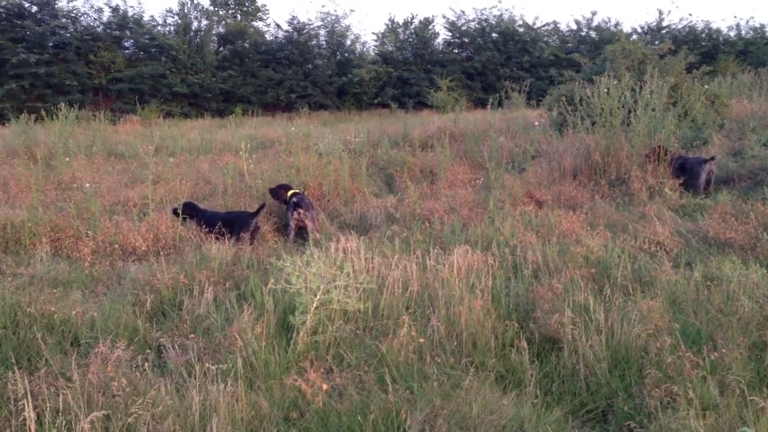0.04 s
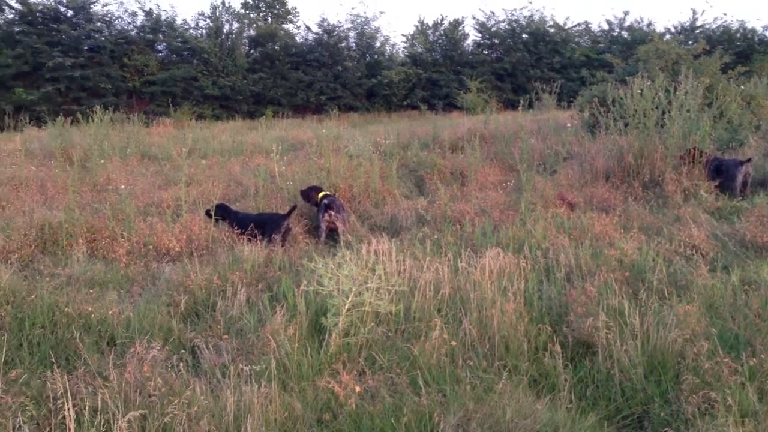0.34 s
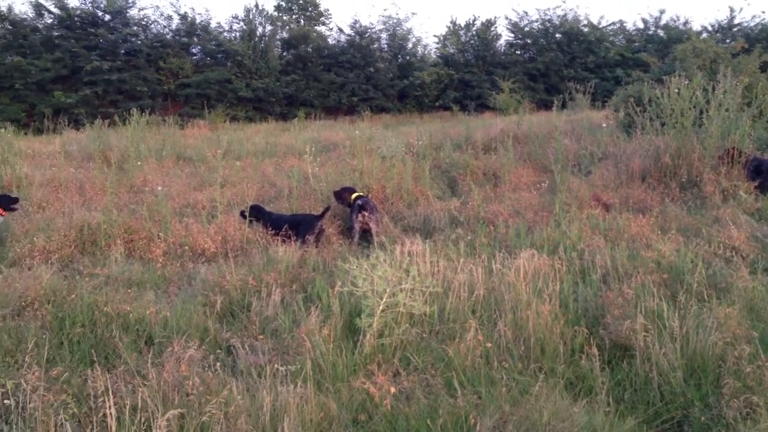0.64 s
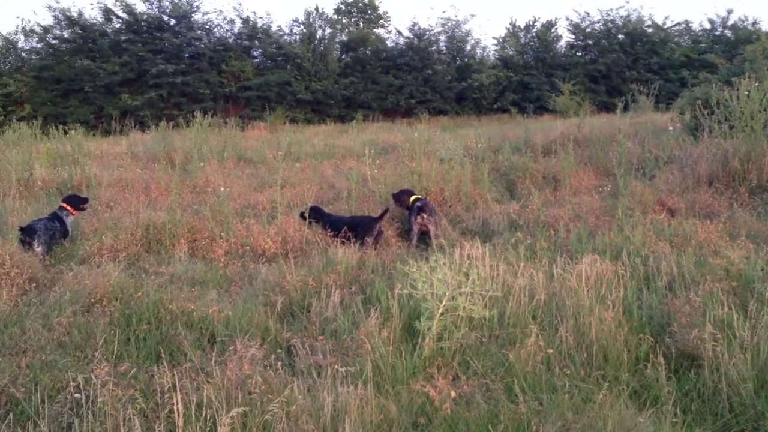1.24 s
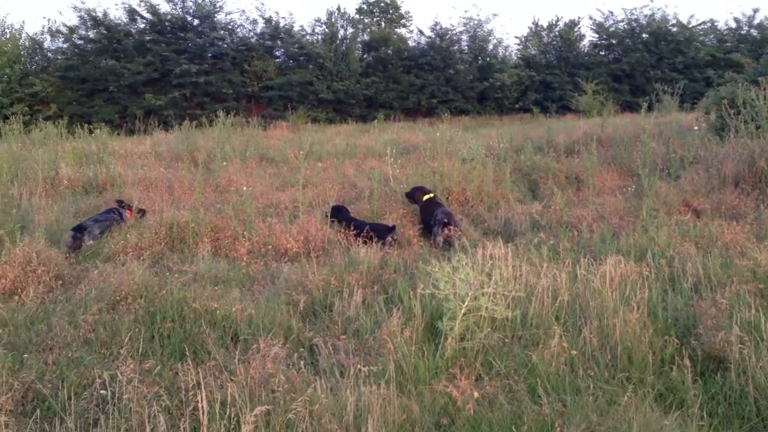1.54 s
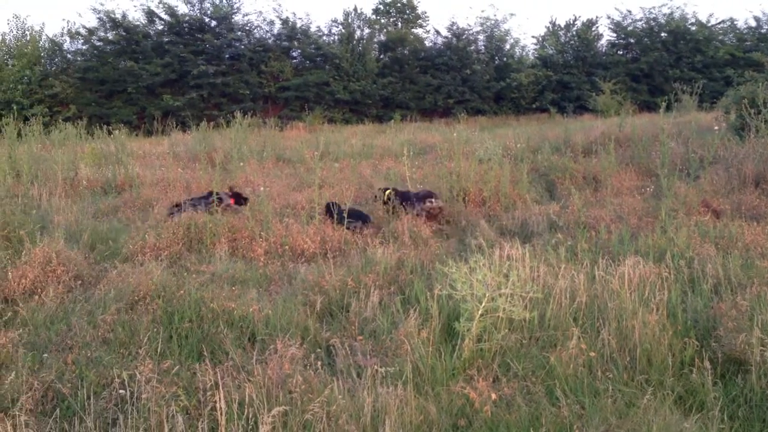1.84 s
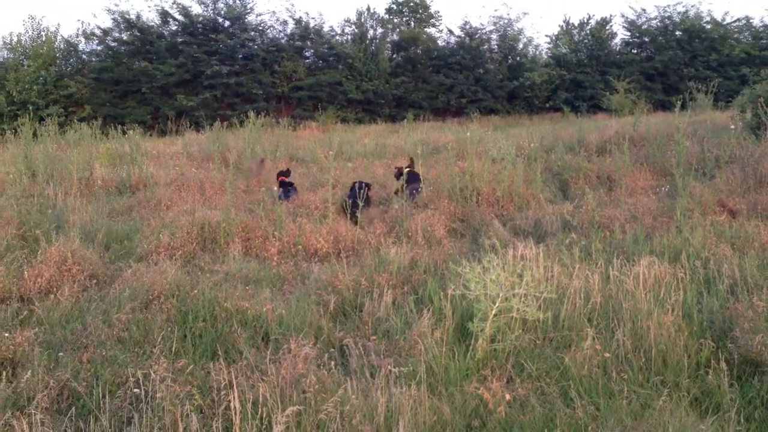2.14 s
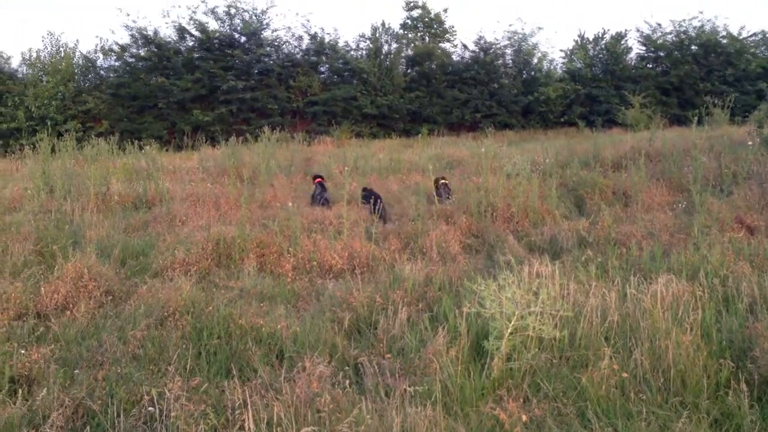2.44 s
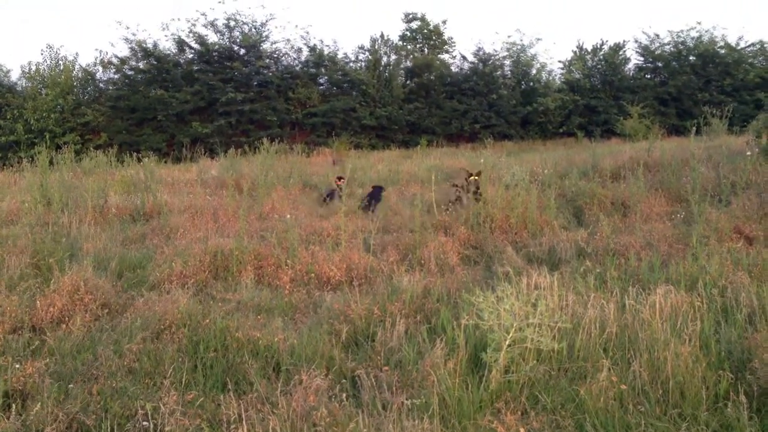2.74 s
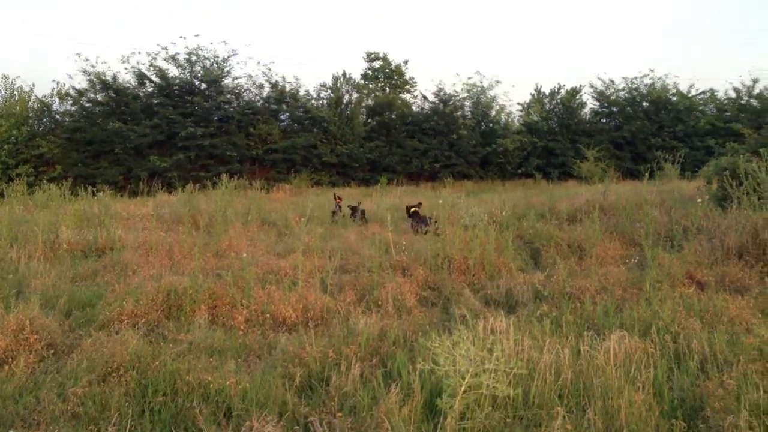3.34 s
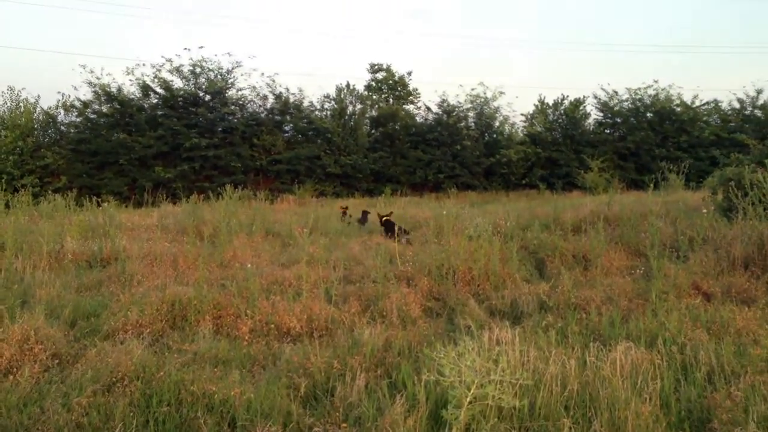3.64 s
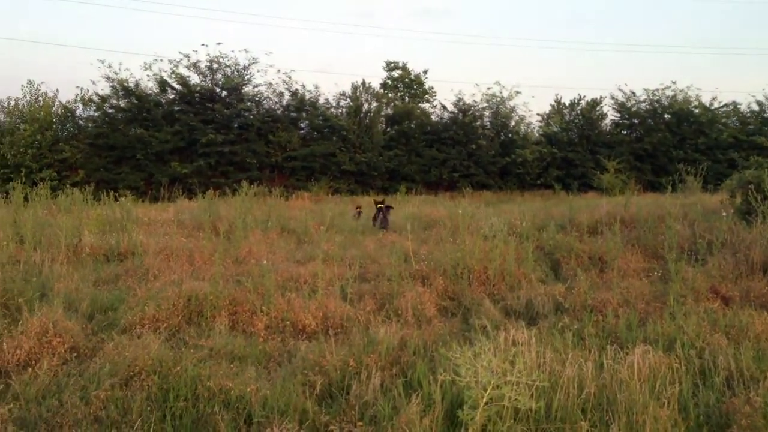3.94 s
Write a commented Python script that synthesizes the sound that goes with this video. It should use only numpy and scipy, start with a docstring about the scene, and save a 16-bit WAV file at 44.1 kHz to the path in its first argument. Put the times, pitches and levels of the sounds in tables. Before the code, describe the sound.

Dogs run through tall dry grass in an open field. After a quiet start with a faint hiss of air, stems swish and crack and paws drum on dry ground ahead of the microphone, thinning as the dogs move away.

```python
"""A quiet field of tall dry grass, in mono, with three dogs standing ahead of the microphone.
Open air murmurs and hisses; two stalks crack faintly, with a brief far-off tone between them.
At 1.4 s the dogs bolt: stems swish and crackle along their bodies and more stalks crack.
From about 1.9 s their paws drum on the dry ground and crunch through tufts. After 3 s the
footfalls thin out as they run off, and the grass rustles on to the end."""
import sys
import numpy as np
from scipy import signal
from scipy.fft import rfft, irfft, next_fast_len
from scipy.io import wavfile
from scipy.ndimage import uniform_filter1d, map_coordinates

SR = 44100
rng = np.random.default_rng(int(sys.argv[2]) if len(sys.argv) > 2 else 0)


def output_pcm(signal):
    """Save a mono or channel-first signal as 16-bit PCM at the path in sys.argv[1].

    Samples are clipped to [-1, 1] before scaling.
    """
    pcm = np.clip(np.atleast_2d(signal).T, -1, 1) * 32767
    wavfile.write(sys.argv[1], SR, np.round(pcm).astype(np.int16))


N = 176400


def amp(db):
    """Decibels to gain."""
    return 10 ** (np.asarray(db) / 20)


def unit(x):
    """Scale to rms 1."""
    return x / np.sqrt(np.mean(x ** 2) + 1e-20)


def curve(rows, column=1):
    """One column of a timed table, one value per sample."""
    rows = np.asarray(rows)
    return np.interp(np.arange(N) / SR, rows[:, 0], rows[:, column])


def wobble(rate):
    """A smooth random curve, rate knots a second."""
    return map_coordinates(rng.standard_normal(int(N * rate / SR) + 4), [np.arange(N) * rate / SR])


def filtered(x, response):
    """x through a gain that depends on frequency."""
    size = next_fast_len(N + SR // 2)
    return irfft(rfft(x, size) * response(np.fft.rfftfreq(size, 1 / SR)), size)[..., :N]


def coloured(x, spectrum):
    """x through a spectrum (f/Hz, level/dB), at rms 1."""
    f, db = np.transpose(spectrum)
    return unit(filtered(x, lambda hz: amp(np.interp(np.log(hz + 1), np.log(f + 1), db))))


def noise(spectrum):
    """Fresh noise with a given spectrum."""
    return coloured(rng.standard_normal(N), spectrum)


def ticks(per_s, spread_db):
    """Random impulses, many weak and a few strong."""
    size = amp(spread_db * np.minimum(rng.exponential(size=N), 4))
    return (rng.random(N) < per_s / SR) * size * rng.choice([-1, 1], N)


def since(s):
    """Seconds elapsed since s, zero before it."""
    return np.maximum(np.arange(N) / SR - s, 0)


def swell(t, rise_s, steep):
    """An envelope that peaks at 1 after rise_s, then dies away."""
    u = t / rise_s
    return (u * np.exp(1 - u)) ** steep


def add(track, s, sound):
    """Mix a short sound into the track at s."""
    part = track[round(s * SR):][:len(sound)]
    part += sound[:len(part)]


def air():
    """The low murmur of the open field wavers under a steady hiss."""
    # open air: f/Hz, level/dB
    spectrum = [(25, -37), (45, -30), (88, -18.5), (135, -7.5), (190, -7.5), (280, -7.5), (375, -5.5),
                (480, -7.5), (560, -9), (720, -6), (930, -15), (1200, -15), (1700, -19.5), (4600, -18),
                (8000, -20), (15200, -21)]
    steady = noise(spectrum)
    murmur = filtered(steady, lambda hz: 1 / (1 + (hz / 1000) ** 4))
    hiss = steady - murmur
    return amp(-66) * (hiss + amp(0.77 * wobble(10)) * murmur)


def stalk_and_grass_bursts():
    """Stalks crack sharply; the longer burst at 1.82 s is a brief swell of brushed grass."""
    # stalk cracks and the grass swell: t/s, level/dB, time to fall 20 dB/s, muffled above f/Hz
    bursts = [(.341, -61, .02, 7000), (.95, -70, .02, 6000), (1.486, -42.5, 0.0069, 4500),
              (1.743, -38.5, 0.0054, 9000), (1.821, -42, 0.064, 7500), (2.151, -44, 0.0047, 12000),
              (2.327, -54, .01, 7000), (2.459, -41, 0.016, 12000), (2.864, -37, 0.0077, 9000),
              (3.227, -40, 0.0076, 15000), (3.300, -52, 0.04, 15000), (3.736, -47, 0.043, 7000),
              (3.868, -37, 0.0094, 15000)]
    # colour of the bursts: f/Hz, level/dB
    spectrum = [(40, -60), (300, -28), (1200, -9), (2500, -1.5), (5000, 2.5), (8000, -5.5), (15000, 2)]
    out, t = np.zeros(N), np.arange(SR // 8) / SR
    bright = noise(spectrum)
    attack = 1 - np.exp(-t / 0.00033)
    for k, (s, db, decay_s, hz) in enumerate(bursts):
        burst = bright[k * len(t):][:len(t)] * attack * amp(db - 20 * t / decay_s)
        add(out, s, signal.lfilter(*signal.butter(2, hz, fs=SR), burst))
    return out


def far_tone():
    """One faint, brief tone carries from far away."""
    t, hz = since(.55), 505
    return amp(-65) * swell(t, rise_s=.035, steep=1.6) * np.sin(2 * np.pi * hz * t + .5 * wobble(52.2))


def brushed_grass():
    """Blades slide along the dogs as a swish, while countless dry stems tick against each other."""
    # brushing by the running dogs: t/s, level/dB
    brushing = [(1.4, -61), (1.47, -62.5), (1.49, -61), (1.56, -60), (1.61, -51.5), (1.72, -50),
                (1.87, -42), (1.93, -45.5), (2.0, -40), (2.09, -41.5), (2.13, -47.5), (2.47, -44),
                (2.51, -50), (2.59, -44.5), (2.66, -49.5), (2.69, -45.5), (2.81, -50), (2.88, -45.5),
                (2.98, -49.5), (2.99, -45.5), (3.2, -52.5), (3.31, -52), (3.33, -58.5), (3.41, -54),
                (3.46, -57), (3.49, -47), (3.51, -52), (3.59, -48.5), (3.71, -54.5), (3.74, -47.5),
                (3.77, -55), (3.88, -51), (3.98, -52), (4.0, -55)]
    # lower rustle: t/s, unused level/dB, level relative to the brushing/dB
    rustling = [(1.52, -58, -6.5), (1.85, -44, -12), (2.06, -41, -8.5), (2.13, -48, -5), (2.47, -45, -10.5),
                (2.49, -47, -9), (3.05, -48, -10), (3.36, -56, -5), (3.6, -49, -8.5), (3.71, -55, -8.5),
                (3.74, -47, -13), (3.78, -55, -1), (3.87, -50, -2.5), (4.0, -54, -4.5)]
    # blades and stems: f/Hz, level/dB
    bright = [(40, -70), (200, -48), (900, -47), (1700, -15), (2500, -11), (3400, -7), (4400, -2),
              (5800, 0), (7300, -0.74), (9000, -4.5), (11500, -7.5), (15200, -12.5)]
    # lower rustle: f/Hz, level/dB
    low = [(40, -60), (150, -27), (450, -5), (1000, -7.5), (1400, -3.5), (1800, -4), (2150, -0.5),
           (3200, -1), (4500, -2), (8000, -18)]
    fade_in = np.clip(since(brushing[0][0]) / 0.11, 0, 1)
    effort = fade_in * amp(curve(brushing) + .3 * wobble(45))
    swish = amp(-1.5 + 0.82 * wobble(25.24)) * noise(bright)
    crackle = amp(-5 + 1.86 * wobble(90)) * coloured(ticks(per_s=7000, spread_db=3.5), bright)
    rustle_db = -4.5 + curve(rustling, column=2) + 2 * wobble(40)
    rustle = amp(rustle_db) * coloured(ticks(per_s=3000, spread_db=3.6), low)
    # each tuft colours the swish a little differently
    spectra = signal.stft(swish + crackle + rustle, SR, nperseg=512)[2]
    patches = uniform_filter1d(rng.standard_normal(spectra.shape), size=9, axis=0)
    patch_db = 1.24 * unit(uniform_filter1d(patches, size=7, axis=1))
    return effort * signal.istft(spectra * amp(patch_db), SR, nperseg=512)[1][:N]


def patter():
    """The lighter steps merge into an uneven rumble of the ground."""
    # light steps: t/s, level/dB
    steps = [(1.7, -89), (1.9, -67.5), (2.1, -60), (2.35, -61.5), (2.6, -67.5), (3.0, -71.5), (3.4, -77.5),
             (4, -72)]
    # dry ground: f/Hz, level/dB
    ground = [(30, -45), (70, -26), (120, 1), (200, 3), (290, -3), (360, -10.5), (650, -4), (1000, -9.5),
              (2500, -33.5)]
    return amp(curve(steps) + 3.4 * wobble(29.69)) * noise(ground)


def landing_thuds():
    """The dogs' weight lands on the ground in low thuds."""
    # landings: t/s, relative peak level/dB, f/Hz
    thuds = [(1.875, -50, 185), (1.913, -55, 233), (1.981, -53, 167), (2.013, -47.5, 215),
             (2.068, -50, 153), (2.092, -54, 199), (2.122, -48, 205), (2.168, -44.5, 200),
             (2.198, -59, 140), (2.269, -53, 180), (2.315, -46, 204), (2.413, -68, 170), (2.434, -47, 183),
             (2.457, -49.5, 157), (2.494, -56, 150), (2.527, -54, 193), (2.571, -51.5, 160),
             (2.634, -60, 222), (2.723, -54.5, 197), (2.748, -60, 240), (2.806, -55, 152),
             (2.866, -54, 162), (2.993, -59, 193), (3.307, -58, 210)]
    out, t = np.zeros(N), np.arange(SR // 10) / SR
    envelope = swell(t, rise_s=.008, steep=2.5)
    for (s, db, hz), phase in zip(thuds, rng.random(len(thuds))):
        add(out, s, amp(db - 2.1) * envelope * np.sin(2 * np.pi * (hz * t + phase)))
    return out


def crunching_tufts():
    """A tuft gives way under a paw in a cluster of cracks."""
    # trampled tufts: t/s, level/dB, length/s
    crunches = [(1.895, -55, 0.03), (1.99, -45.5, 0.026), (2.062, -54.5, 0.027), (2.189, -53, 0.013),
                (2.273, -52, 0.013), (2.311, -53.5, 0.033), (2.62, -59, 0.024), (3.253, -59, 0.017),
                (3.855, -58, 0.017)]
    # a crushed tuft: f/Hz, level/dB
    spectrum = [(40, -60), (200, -26), (700, -2.5), (1400, 8), (1850, 3), (2200, 3.5), (4500, -4),
                (9000, -18.5), (15000, -22)]
    crush, t = np.zeros(N), np.arange(SR // 8) / SR
    for s, db, length_s in crunches:
        add(crush, s, amp(db) * swell(t, rise_s=length_s / 2, steep=3))
    return crush * coloured(ticks(per_s=4000, spread_db=3.9), spectrum)


def paw_knocks():
    """A paw strikes the ground with a hollow, heavily damped knock and a scuff of soil."""
    # paw strikes: t/s, relative peak level/dB, f/Hz
    knocks = [(1.961, -46, 627), (2.046, -49, 570), (2.126, -37.5, 680), (2.198, -36.5, 696),
              (2.220, -49, 560), (2.273, -43.5, 766), (2.281, -46, 703), (2.297, -50, 584),
              (2.320, -50.5, 704), (2.360, -53, 536), (2.433, -39.5, 725), (2.453, -49, 593),
              (2.530, -50.5, 500), (2.588, -44, 608), (2.666, -44, 745), (2.768, -53, 590),
              (2.862, -54, 780), (2.904, -52.5, 680), (2.926, -49.5, 626), (2.956, -54, 800),
              (2.977, -56, 720)]
    # soil under a paw: f/Hz, level/dB
    soil = [(40, -55), (150, -23), (450, -2), (800, 0), (1300, -7.5), (2000, -15), (6000, -40)]
    out, scuff, t = np.zeros(N), np.zeros(N), np.arange(SR // 10) / SR
    rise_s = 0.0039
    for (s, db, hz), phase in zip(knocks, rng.random(len(knocks))):
        add(out, s, amp(db - 1) * swell(t, rise_s, steep=2.46) * np.sin(2 * np.pi * (hz * t + phase)))
        add(scuff, s, amp(db - 12.5) * swell(t, rise_s, steep=1.3))
    return out + scuff * noise(soil)


def scene():
    """Everything lies straight ahead of the microphone, the same in both channels."""
    mono = air() + stalk_and_grass_bursts() + far_tone() + brushed_grass()
    mono += patter() + landing_thuds() + crunching_tufts() + paw_knocks()
    return np.array([mono, mono])


def record(dry):
    """The camera's microphone channels keep nothing above their band limit."""
    return filtered(dry, lambda hz: hz < 15330)


dry = scene()
out = record(dry)
output_pcm(out)
```